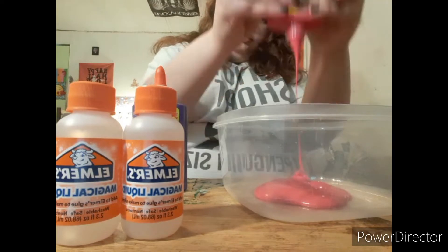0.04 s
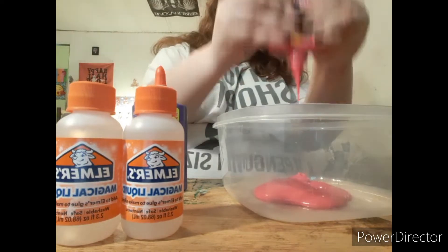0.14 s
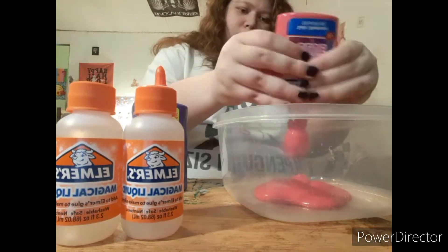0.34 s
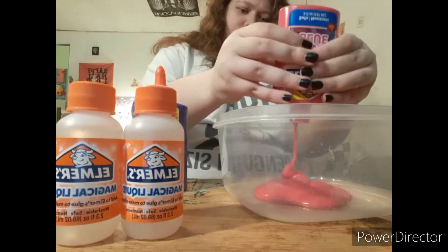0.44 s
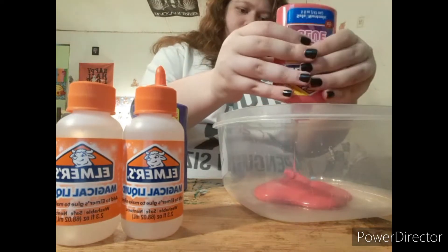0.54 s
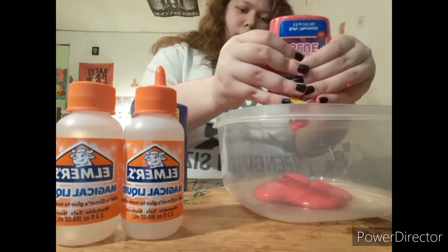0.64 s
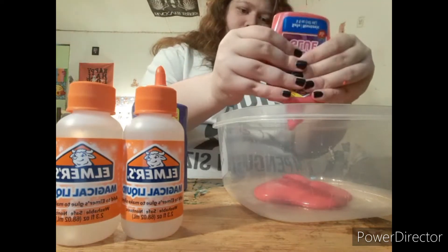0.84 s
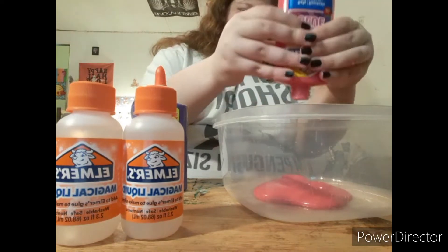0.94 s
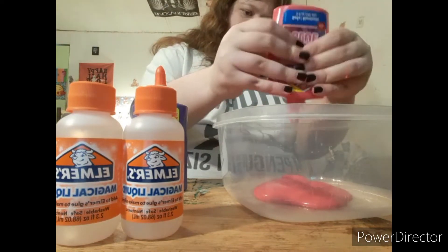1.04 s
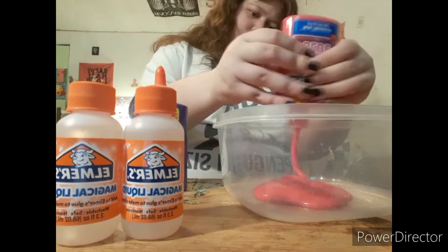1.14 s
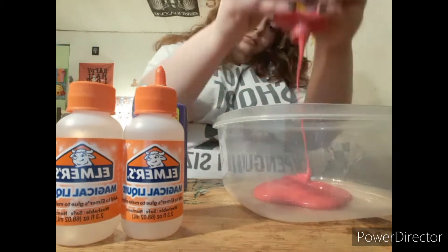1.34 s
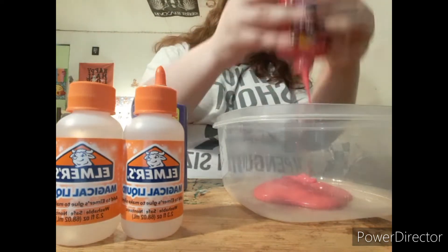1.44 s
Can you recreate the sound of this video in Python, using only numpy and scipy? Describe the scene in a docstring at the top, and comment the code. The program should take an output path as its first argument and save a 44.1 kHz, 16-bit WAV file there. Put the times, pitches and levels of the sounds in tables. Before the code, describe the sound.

A glue bottle sputters as it is squeezed, with sharp wet clicks and crackling air spits

```python
"""A plastic bottle of thick glue is squeezed upside down over a plastic bowl in a small room.
Trapped air sputters through the nozzle in short crackling spits, made of shaped noise. Bubbles in the
glue burst with sharp clicks and lower plops, made of short dying sine waves. Bowl and room ring
briefly, and a faint wavering hum with soft room noise lies underneath."""
import sys
import numpy as np
from scipy import signal
from scipy.fft import rfft, irfft, next_fast_len
from scipy.io import wavfile

SR = 44100
rng = np.random.default_rng(int(sys.argv[2]) if len(sys.argv) > 2 else 0)


def pcm_store(signal):
    """Save signal as 16-bit PCM."""
    levels = np.round(np.clip(np.atleast_2d(signal), -1, 1) * 32767)
    wavfile.write(sys.argv[1], SR, levels.astype(np.int16).T)


N = 66150   # length in samples: 1.5 s
T = np.arange(N) / SR   # time in seconds
SIZE = next_fast_len(2 * N)   # room for a filter's tail, so that it does not wrap around
HZ = np.maximum(np.arange(SIZE // 2 + 1) * SR / SIZE, 1)   # frequency of each spectrum bin


def from_db(db):
    """Turn decibels into gain."""
    return 10 ** (np.asarray(db) / 20)


def rms_one(x):
    """Scale to rms 1."""
    return x / np.sqrt(np.mean(x ** 2))


def at_hz(points):
    """Read a table over frequency, with straight lines on a log frequency axis."""
    hz, value = np.transpose(points)
    return np.interp(np.log(HZ), np.log(hz), value)


def filtered(x, response):
    """Apply a frequency response."""
    return irfft(rfft(x, SIZE) * response, SIZE)[..., :N]


def colour(points):
    """Turn a dB table into a response with unit power gain that never sounds early (minimum phase)."""
    gain = rms_one(from_db(at_hz(points)))
    cepstrum = irfft(np.log(gain), SIZE)
    # doubling the first half and dropping the second makes the response minimum-phase
    keep_first_half = 1 + np.sign(np.fft.fftfreq(SIZE))
    return np.exp(rfft(cepstrum * keep_first_half))


def wander(rate_hz):
    """Waver at random with a spread of about 1: lines drawn between random points."""
    return np.interp(T * rate_hz, np.arange(N), rng.standard_normal(N))


# How alike left and right noise are. Each row: frequency in Hz, likeness (1 same, 0 unrelated).
LEFT_RIGHT_LIKENESS = [(200, 1), (1500, 0.88), (3000, 0.15), (6000, 0), (15000, 0)]


def diffuse_noise():
    """Stereo noise, alike in the bass and unrelated in the treble, as sound from all around is."""
    alike = at_hz(LEFT_RIGHT_LIKENESS)
    mid, side = rng.standard_normal((2, N))
    mid = filtered(mid, np.sqrt((1 + alike) / 2))
    side = filtered(side, np.sqrt((1 - alike) / 2))
    return mid + np.array([side, -side])


# Tones of the hum. Each row: frequency in Hz, starting rms level in dB, fade in dB per second.
HUM_TONES = [(222.3, -72, 1.5), (332.7, -75, 3.5), (325, -76, 4.5), (376, -68, 13.5), (600, -81, 0),
             (720, -82, 4.5)]
# Tone colour of the room noise. Each row: frequency in Hz, relative level in dB per Hz.
AIR_COLOUR = [(25, -15.5), (80, -18), (150, -14.5), (300, 0), (500, -12), (900, -16.5), (2700, -20),
              (5000, -25.5), (15000, -30)]
# Level changes shared by hum and room noise. Each row: time in seconds, gain in dB.
BACKGROUND_LEVEL = [(0, 0), (.25, 0), (.55, 0), (1.05, 1), (1.3, -11), (1.5, 1.5)]
HUM_WAVER_DB, AIR_DB = 2, -69.5   # spread of the hum's level; rms of the room noise before level changes


def background():
    """A wavering, fading hum over soft room noise; both dip near the end and come back."""
    hum = 0
    for hz, db, fade in HUM_TONES:
        level = from_db(db - fade * T + HUM_WAVER_DB * wander(16))
        phase = 2 * np.pi * (hz * T + rng.random()) + .4 * wander(30)   # wavers in phase too
        hum = hum + level * np.sqrt(2) * np.sin(phase)
    air = from_db(AIR_DB) * filtered(diffuse_noise(), colour(AIR_COLOUR))
    return from_db(np.interp(T, *np.transpose(BACKGROUND_LEVEL))) * (hum + air)


SNAPS_PER_S, SNAP_SHARE = 1300, 0.55   # typical rate of tearing films; their share of the power


def crackle():
    """Tiny films of glue tear one after another at uneven intervals, over a rush of air."""
    rate = SNAPS_PER_S * np.exp(.5 * wander(SNAPS_PER_S))
    torn_so_far = np.floor(np.cumsum(rate) / SR)
    snaps = rms_one(np.diff(torn_so_far, prepend=0) * rng.choice([-1, 1], N))
    rush = rng.standard_normal(N)
    return np.sqrt(SNAP_SHARE) * snaps + np.sqrt(1 - SNAP_SHARE) * rush


# Spits of air. Each row: time of the peak in seconds, rise in seconds, fall in seconds,
# then the level in dB of the nozzle note, of the hiss and of the wet gurgle.
AIR_SPITS = [(0.2176, .0025, 0.0041, -32, -58, -57.5), (0.232, 0.0068, 0.013, -40.5, -42.5, -57.5),
             (0.244, 0.003, .0022, -17.5, -21.5, -23), (0.41, 0.0052, 0.0031, -51, -65.5, -49),
             (0.4815, 0.0016, 0.0075, -52, -57, -36), (0.5427, 0.0015, 0.0065, -40.5, -67, -48),
             (0.5838, 0.00077, 0.002, -34.5, -55, -41), (0.6258, 0.0021, 0.0014, -20.5, -31, -37.5),
             (0.658, 0.0015, 0.0053, -24, -30.5, -31), (0.6934, 0.004, 0.0022, -19.5, -29, -32),
             (0.739, 0.0038, 0.0048, -35, -32, -45.5), (0.746, 0.0023, 0.0015, -21.5, -35.5, -27.5),
             (0.8098, 0.0037, 0.0029, -17.5, -23.5, -32), (0.8143, 0.0033, 0.0023, -15, -35, -50),
             (0.915, 0.00065, 0.0005, -19.5, -55.5, -36.5), (0.932, 0.006, 0.0064, -34.5, -40, -38.5),
             (0.946, 0.0044, .004, -39, -53, -29.5), (1.0128, 0.00069, 0.0026, -18, -24, -24),
             (1.0194, 0.0021, 0.0022, -17.5, -26, -26.5), (1.114, 0.01, 0.0088, -34.5, -47.5, -46.5),
             (1.1407, 0.0034, 0.0046, -19, -26.5, -25.5), (1.15, 0.004, 0.0079, -29, -38, -64),
             (1.18, 0.0013, 0.00355, -35, -54, -55), (1.1916, 0.00076, 0.00166, -19, -28, -38.5),
             (1.204, 0.0037, 0.0047, -34.5, -47, -37), (1.242, 0.0028, 0.0015, -30.5, -39, -35.5),
             (1.3864, 0.00037, 0.0011, -30, -48.5, -38.5), (1.416, 0.0019, 0.0035, -35.5, -36, -31.5)]
# Tone colours of those three parts. Each row: frequency in Hz, relative level in dB per Hz.
NOZZLE_COLOUR = [(900, -39.5), (1600, -15), (2200, -8), (2750, -2.5), (3200, -10), (3800, -14),
                 (4900, -16.5), (5800, -13), (6500, -38), (9000, -45)]
HISS_COLOUR = [(2500, -22.5), (4000, 5.5), (5700, -11), (6600, -9), (7900, 8), (9200, 0), (10300, 2.5),
               (12000, -8.5), (14500, 0.5), (15800, -13.5)]
GURGLE_COLOUR = [(30, -23.5), (150, -38.5), (300, -9.5), (550, 1), (900, 1.5), (1600, 2), (2300, -12),
                 (4000, -38)]
FLUTTER_DB, FLUTTER_HZ = 6, 1229   # depth and rate of the flutter of glue in the air stream
SPIT_SPREAD = 0.39   # share of a spit's power that reaches the two sides unalike
SPIT_ONSET_POWER = 1.32   # bends the rise; 1 would make it a plain exponential like the fall


def spits():
    """Air forces its way past the glue: a fluttering, crackling burst sounds the nozzle, hisses and gurgles."""
    rows = np.array(AIR_SPITS)
    shapes = []
    for peak_s, rise, fall in rows[:, :3]:
        before = np.abs((peak_s - T) / rise) ** SPIT_ONSET_POWER
        after = (T - peak_s) / fall
        shapes.append(np.exp(-np.minimum(np.where(T < peak_s, before, after), 20)))
    shapes = np.array(shapes)
    flutter = rms_one(from_db(FLUTTER_DB * np.tanh(wander(FLUTTER_HZ))))
    out = 0
    for levels_db, spectrum in zip(rows[:, 3:].T, (NOZZLE_COLOUR, HISS_COLOUR, GURGLE_COLOUR)):
        flow = np.sqrt(from_db(levels_db) ** 2 @ shapes ** 2)   # overlapping spits add in power
        turbulence = np.sqrt(1 - SPIT_SPREAD) * crackle() + np.sqrt(SPIT_SPREAD) * diffuse_noise()
        out = out + filtered(flow * flutter * turbulence, colour(spectrum))
    return out


# Bursting bubbles, from small clicks to large plops. Each row: start in seconds,
# level in dB before the swell and muffling, pitch in Hz, cycles until the ring is 60 dB down.
BUBBLE_POPS = [(.2374, -16.5, 2470, 32), (0.242, -0.5, 2614, 23), (0.2445, -1.5, 1670, 12.7),
               (0.2449, 1.5, 869, 9.36), (.303, -45, 2703, 35), (0.4016, -11, 600, 3.66),
               (0.4589, -27.5, 2460, 15), (.4835, -6.5, 2450, 14.7), (0.4849, -18.5, 1520, 10.2),
               (0.4853, -10.5, 850, 7.8), (0.5814, -19.5, 1830, 6), (0.5838, -16.5, 2370, 10),
               (0.5847, -12, 850, 10.3), (0.6241, -10, 2950, 21), (0.659, -15, 2890, 22),
               (0.6606, -10.5, 3120, 37), (0.6641, -3, 2380, 9.6), (0.6867, -14.5, 3000, 20),
               (0.6914, -14, 1180, 5.4), (0.6908, -15.5, 570, 6.2), (0.692, -3.5, 2850, 14),
               (.738, -23, 2700, 31), (0.7452, -12.5, 2814, 24), (0.7467, -1.5, 711, 5.67),
               (0.7998, -19.5, 2690, 20), (.8036, -19.5, 2760, 20), (0.8096, -8, 2070, 7.2),
               (0.8097, -0.5, 2960, 11.75), (0.8096, -2.5, 3990, 18), (.8133, -16.5, 2130, 14),
               (0.8162, -15.5, 3030, 13), (0.9151, 2, 2710, 15), (0.9259, -11, 2280, 5.7),
               (0.934, -10, 2330, 5), (0.9396, -5, 2160, 6.5), (0.945, 0, 2330, 9),
               (0.9471, 2.5, 1560, 6.6), (0.9476, -4.5, 890, 7.4), (1.0131, -8, 2710, 13),
               (1.0186, -12.5, 2580, 27), (1.019, -6, 960, 4.3), (1.0979, -15, 2750, 15.3),
               (1.1382, -9, 2460, 7.35), (1.1398, -4, 1680, 5.7), (1.138, -15, 735, 11.2),
               (1.1417, 4, 2740, 10), (1.1475, -17, 1340, 14), (1.192, -12, 3910, 24.2),
               (1.1906, -20, 2590, 21), (1.2037, -20, 2600, 13.8), (1.2054, -5.5, 1450, 6.95),
               (1.206, -12.5, 906, 9.7), (1.2410, -18.5, 2630, 24.6), (1.3868, -8, 2696, 10.2),
               (1.4174, -19, 634, 6.4)]
POP_ATTACK_CYCLES, POP_RISE = 0.8, 0.048   # swell of a pop; how strongly its pitch climbs as it rings
POP_SNAP_HZ, POP_SNAP_CYCLES = 740, 0.45   # starts this far above its pitch as the film tears, then settles
POP_TOP_HZ = 4250   # the glue muffles pops above this


def pops():
    """Each bursting bubble snaps down to its pitch and rings for a few cycles, climbing slightly as it opens."""
    out = np.zeros(N)
    for start_s, db, hz, cycles in BUBBLE_POPS:
        turns = np.clip((T - start_s) * hz, 0, 2 * cycles)   # cycles since the start
        swell = 1 - np.exp(-(turns / POP_ATTACK_CYCLES) ** 2)
        dying = np.exp(-np.log(1000) * turns / cycles)
        climb = 1 + POP_RISE * turns / cycles
        snap = POP_SNAP_HZ / hz * POP_SNAP_CYCLES * (1 - np.exp(-turns / POP_SNAP_CYCLES))
        out += from_db(db) * swell * dying * np.sin(2 * np.pi * (turns * climb + snap))
    return signal.sosfilt(signal.butter(4, POP_TOP_HZ, fs=SR, output="sos"), out)


# Ringing pitches of the bowl. Each row: frequency in Hz, gain in dB.
BOWL_RINGS = [(700, -23.5), (930, -10.5), (1150, -28.5), (1290, -8.5), (1410, -9), (1650, -7.5),
              (1800, -19), (2150, -18.5), (2810, -8.5), (2945, -8)]
BOWL_T60_S = .07   # seconds until the ring is 60 dB down


def bowl(x):
    """The bowl under the nozzle rings on at a few pitches, each a resonator driven by the glue sounds."""
    r = np.exp(-np.log(1000) / (BOWL_T60_S * SR))   # what is left of a ring after one sample
    rings = 0
    for hz, db in BOWL_RINGS:
        resonator = [1, -2 * r * np.cos(2 * np.pi * hz / SR), r * r]
        rings = rings + from_db(db) * signal.lfilter([1, 0, -1], resonator, x)
    return (1 - r * r) / 2 * rings   # so that each gain holds at its own pitch


ECHO_DB, ECHO_S, ECHO_CUT_HZ = -18.5, 0.0085, 1600   # level, delay, and where the treble starts to fall


def echo(x):
    """A nearby surface throws back one dull copy."""
    delay = np.exp(-2j * np.pi * HZ * ECHO_S)
    dulling = 1 / (1 + 1j * HZ / ECHO_CUT_HZ) ** 2
    return from_db(ECHO_DB) * filtered(x, delay * dulling)


# Tone colour of the room's reflections. Each row: frequency in Hz, relative level in dB.
REFLECTION_COLOUR = [(100, -2), (500, -13), (1200, 3.5), (2700, -1.5), (5000, -1), (9000, 5.5),
                     (15000, 3.5)]
ROOM_DB, ROOM_T60_S, ROOM_DELAY_S = -9.5, 0.064, 0.0015   # level, time to fall 60 dB, delay of both tails
LATE_DB, LATE_T60_S = -42, .35   # level of the longer tail, time to fall 60 dB


def room(x):
    """Dense reflections from table and walls die quickly and leave a faint longer tail."""
    tail = 0
    for db, t60 in ((ROOM_DB, ROOM_T60_S), (LATE_DB, LATE_T60_S)):
        decay = np.exp(-np.log(1000) * T / t60) * (T > ROOM_DELAY_S)
        tail = tail + from_db(db) * rms_one(decay) / np.sqrt(N)
    reflections = rfft(tail * diffuse_noise(), SIZE)
    return filtered(x, reflections * colour(REFLECTION_COLOUR))


# Loudness between the sides. Each row: frequency in Hz, left minus right in dB.
SIDE_BALANCE = [(300, 4.5), (900, 2), (2000, 3), (2800, 0.25), (4000, 3), (5900, 3.5), (7800, 3.5),
                (10400, 3), (14000, 0)]
# Phase between the sides. Each row: frequency in Hz, lead of the left in radians (negative lags).
LEFT_PHASE_LEAD = [(100, 1.2), (1000, -0.61), (2000, 0.48), (2800, 0.78), (3400, 2), (5000, 1.55),
                   (6600, 1.5), (7900, 4.5), (9000, 0.6), (10400, 0), (12000, 1), (14000, -4)]
LOW_CUT_HZ = 220


def scene():
    """The nozzle is close, a little to the left, and too small to radiate bass."""
    low_cut = signal.butter(1, LOW_CUT_HZ, "high", fs=SR, output="sos")
    glue = signal.sosfilt(low_cut, spits() + pops())
    near = glue + bowl(glue)
    # each side takes half of the difference, in opposite directions
    left = from_db(at_hz(SIDE_BALANCE) / 2) * np.exp(.5j * at_hz(LEFT_PHASE_LEAD))
    direct = filtered(near, np.array([left, 1 / left]))
    return direct + echo(near) + room(near) + background()


CUTOFF_HZ = 16200


def record(dry):
    """The highest peaks are rounded and the top is cut steeply."""
    rounded = dry / (1 + (dry / .97) ** 20) ** (1 / 20)
    return signal.sosfiltfilt(signal.butter(24, CUTOFF_HZ, fs=SR, output="sos"), rounded)


dry = scene()
out = record(dry)
pcm_store(out)
```